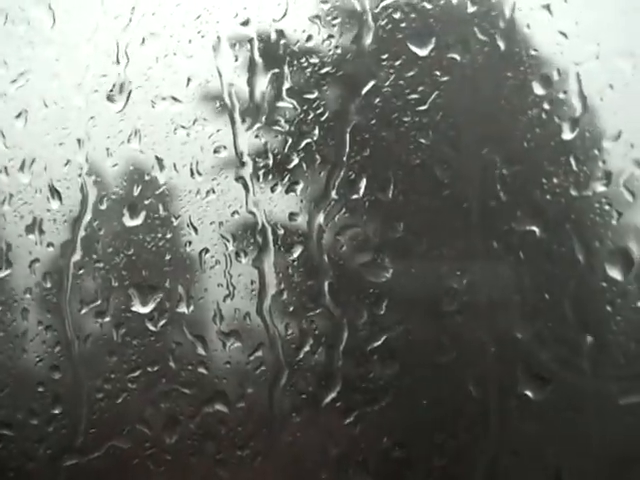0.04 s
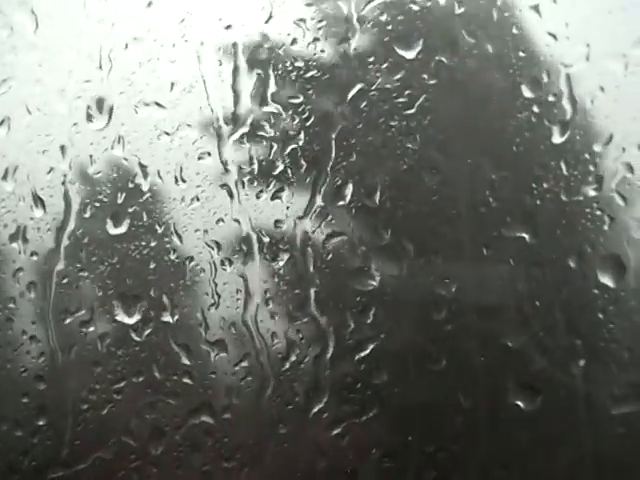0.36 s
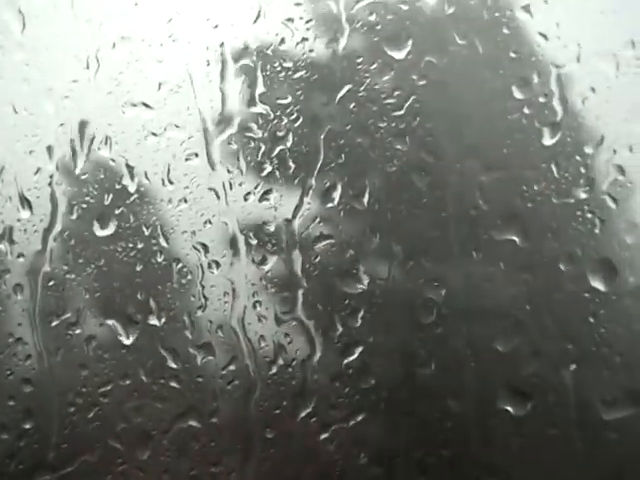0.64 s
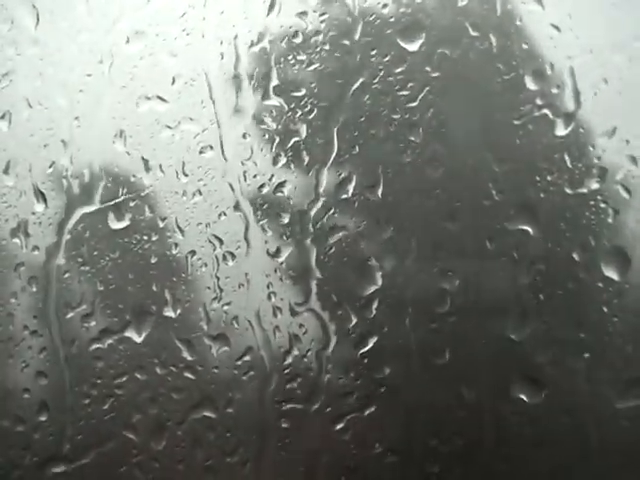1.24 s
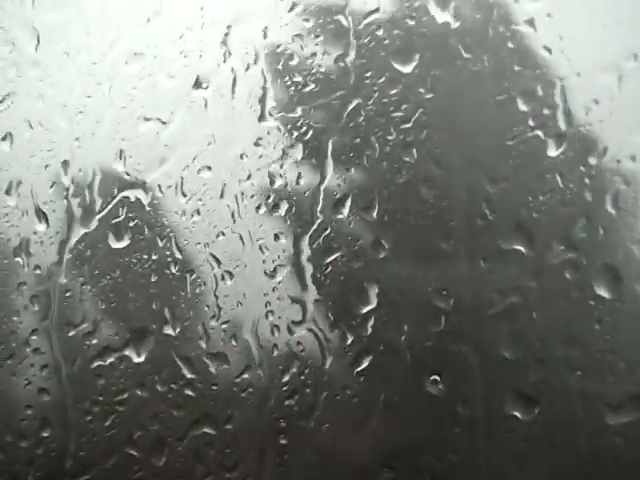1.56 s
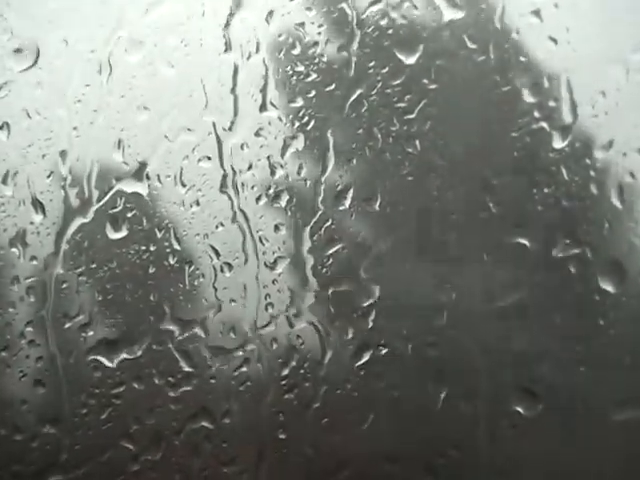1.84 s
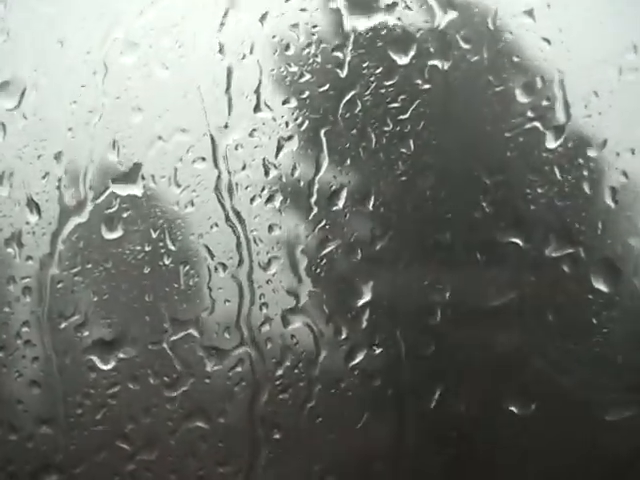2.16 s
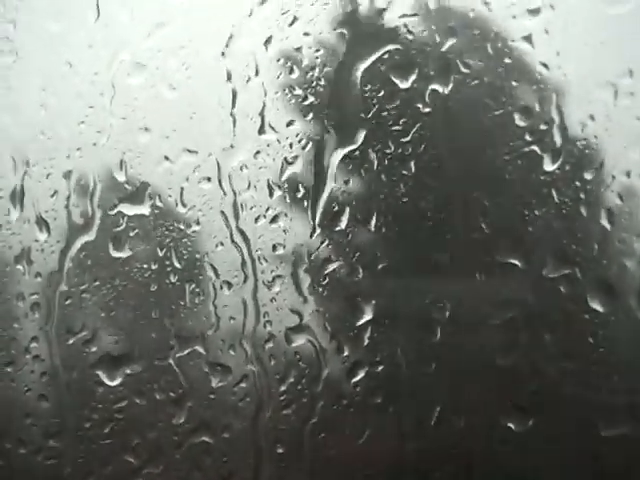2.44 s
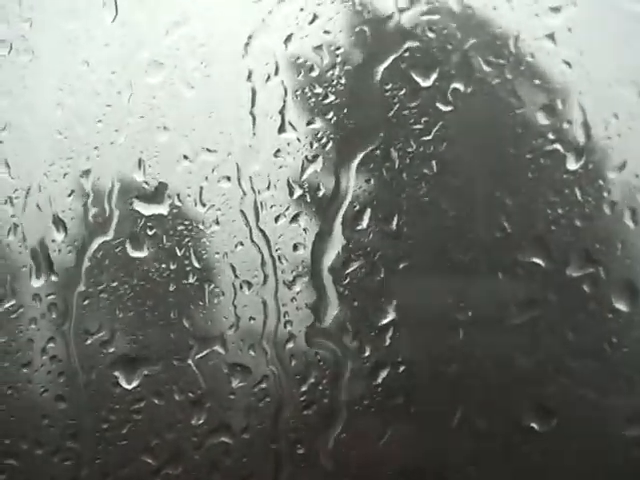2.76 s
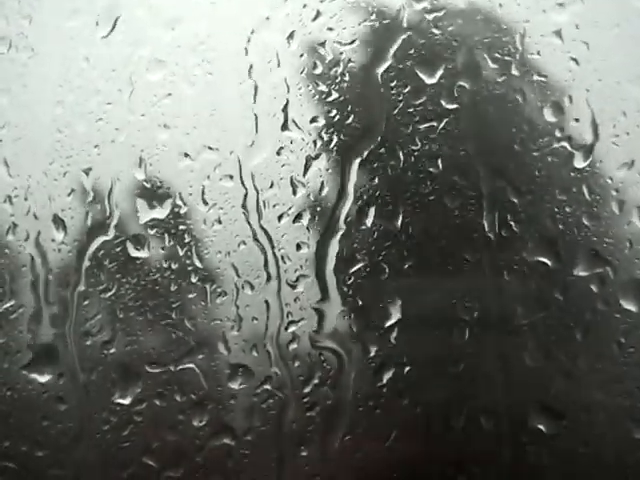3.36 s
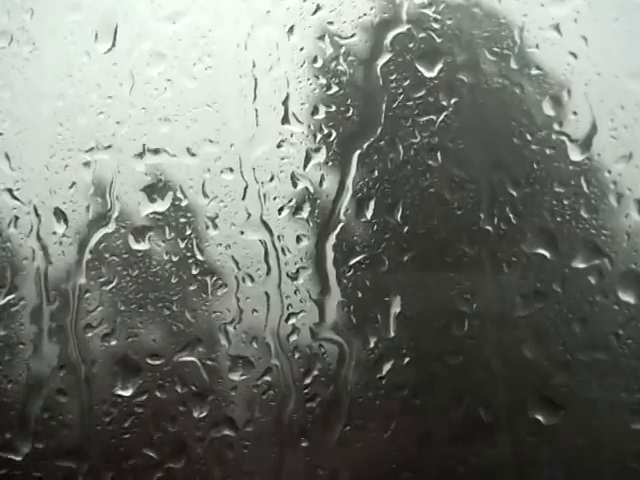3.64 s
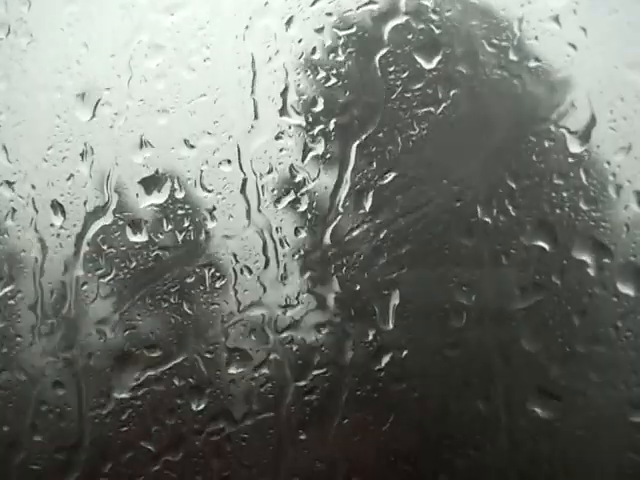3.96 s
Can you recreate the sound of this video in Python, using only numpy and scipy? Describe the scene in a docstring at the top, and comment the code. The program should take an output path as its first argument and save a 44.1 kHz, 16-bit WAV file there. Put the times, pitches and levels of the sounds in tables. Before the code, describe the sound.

Hail strikes a parked car, heard from inside close to the window. Separate booming knocks on the roof and sharp cracks on the glass thicken into a dense clatter over steady rain, and small ticking pellets join in.

```python
"""Inside a parked car in hail and fat raindrops, stereo microphone close behind the wet window.
Stones on the roof and panels clatter and make the cabin boom; those on the near glass crack sharply.
Single blows thicken into a dense clatter over a steady wash of rain, and small pellets join in.
The loudest blows overload the microphone."""
import sys
import numpy as np
from scipy import signal
from scipy.fft import rfft, irfft
from scipy.io import wavfile

SR = 44100
rng = np.random.default_rng(int(sys.argv[2]) if len(sys.argv) > 2 else 0)


def log_audio(samples):
    """Write samples as a 16-bit WAV file to the path given in sys.argv[1]."""
    # one column per channel
    frames = np.atleast_2d(samples).T
    # limit to full scale, then quantise
    limited = np.clip(frames, -1, 1)
    pcm = np.round(limited * 32767).astype(np.int16)
    wavfile.write(sys.argv[1], SR, pcm)


N = 176400

# Table levels are relative: each source sets its own gain.
# the two microphone ports (frequency [Hz], unrelated part [dB], left minus right [dB])
MIC_PORTS = [(30, -14, -2), (120, -18, -4), (300, -31, -3), (700, -17, -2.5), (1400, -20, -2.5),
             (2940, -10.5, -1.6), (5600, -11, -0.6), (9050, -4.5, 1.2), (13000, 1.5, 1.5)]
# borders of the four registers: boom, knock, clatter, sizzle (frequency [Hz])
REGISTER_EDGES = [20, 450, 1800, 5000, 20000]

# colour of the steady rain on the body (frequency [Hz], level [dB])
RAIN_COLOUR = [(25, -33), (60, -15.5), (125, -8.5), (180, -5), (290, 2.5), (400, -11), (650, -4),
               (950, -9.5), (1400, -17.5), (2300, -18.5), (3900, -19), (6000, -30), (8500, -36),
               (12000, -48), (15500, -55)]
# thin ring in the rain's hiss (centre [Hz], width [Hz], lift [dB])
HISS_RING = (3130, 300, 9.5)
# small pellets between the big stones (time [s], level [dB])
PELLET_SWELL = [(0, -71), (2.45, -68), (2.7, -28.5), (4, -33)]

# colour of the struck glass (frequency [Hz], level [dB])
GLASS_COLOUR = [(400, -9.5), (1500, -17.5), (2700, 0.5), (4400, 4), (6200, -0.5), (8000, -5.5),
                (10000, -11), (15000, -31)]
# the pane's knock, crack and sizzle (t60 [s], frame ring share [ratio], frame t60 [s], lift [dB])
GLASS_DECAYS = [(0.0084, 0.18, 0.1, -3), (0.013, 0.39, 0.093, 1.5), (0.015, 0.13, 0.085, 2.5)]
# stones on the near window (time [s], knock [dB], crack [dB], sizzle [dB])
GLASS_BLOWS = [(0.21, -38, -19, -18), (0.313, -15, -15.5, -16), (0.457, -15, -18, -17.5),
               (0.685, -29, -53, -37), (1.188, -44, -19, -20.5), (1.298, -20, -23.5, -22.5),
               (1.348, -33, -28, -26), (1.402, -21, -15.5, -13), (1.45, -10, -16, -22),
               (1.4995, -9, -19, -18), (1.595, -5, -14, -26), (1.927, -16.5, -21.5, -31),
               (1.9413, -29, -11, -11.5), (2.271, -23, -15, -16), (2.544, -20, -17.5, -29),
               (2.559, -20, -21, -24), (2.638, -15, -8, -3.5), (2.684, -14, -17, -21),
               (2.723, -17, -11, -17.5), (2.86, -14, -27.0, -10), (2.917, -32, -20, -18),
               (2.9254, -18, -16.5, -18), (2.992, -12, -16, -19), (3.039, -18, -12.5, -21),
               (3.162, -17, -11.5, -15.5), (3.259, -7, -18, -16), (3.289, -26, -15, -17.5),
               (3.428, -34, -16, -15), (3.468, -17, -11, -32), (3.534, -17, -13, -24),
               (3.559, -28, -28, -25), (3.618, -31, -17, -24), (3.697, -8, -13.5, -21),
               (3.735, -31, -19, -17), (3.84, -26, -14, -17), (3.924, -22, -17, -24),
               (3.995, -20, -12, -22)]

# colour of the struck panels (frequency [Hz], level [dB])
PANEL_COLOUR = [(30, -58.5), (60, -37.5), (120, -21.5), (170, -13.5), (230, -9), (300, -4.5), (410, -7),
                (500, -9), (620, -13.5), (1000, -12.5), (1600, -11.5), (2200, -10.5), (2700, -8),
                (3300, -12), (4200, -11.5), (6000, -19), (8200, -19.5), (10000, -33.5), (13000, -41),
                (15500, -61)]
# the panels' four registers (attack [s], t60 [s], cabin tail share [ratio], tail t60 [s])
PANEL_DECAYS = [(0.018, 0.56, 0.034, 1), (0.0024, 0.38, 0.029, 1), (0.00082, 0.17, 0.16, 0.98),
                (0.00023, 0.11, 0.16, 0.62)]
# modes of the roof and panels (frequency [Hz], t60 [s], level against their register [dB])
METAL_MODES = [(234, .4, -15), (290, .45, -10), (317, .35, -11), (343, .28, -13), (418, .3, -15),
               (537, .28, -13), (712, .28, -14), (1087, .42, -11), (1508, .28, -13), (1642, .28, -13),
               (2645, .2, -10), (3998, .14, -14), (4596, .14, -16)]
# pitched thuds and knocks of hollow spots (time [s], frequency [Hz], level [dB], t60 [s])
HOLLOW_BLOWS = [(0.213, 288, -10.5, 0.54), (0.407, 249, -15.5, 0.36), (0.412, 316, -14, 0.38),
                (0.884, 287.8, -14.5, 0.43), (1.141, 343, -4, 0.12), (1.141, 290, -18, 0.52),
                (1.451, 880, 2.5, 0.021), (1.472, 321, -7, 0.28), (1.595, 2140, -5, 0.038),
                (1.6, 303.6, -2.5, 0.19), (2.107, 287, -12.5, 0.44), (2.268, 291, -7, 0.13),
                (2.361, 345.7, -6, 0.21), (2.361, 398, -11, 0.1), (2.576, 297, -6.5, 0.18),
                (2.655, 290.3, -13.5, 0.52), (2.85, 338, -5, .2), (2.884, 283.5, -8.5, 0.5),
                (2.887, 2180, -6, 0.049), (3.158, 292, -14.5, 0.59), (3.288, 345.6, -10.5, .28),
                (3.503, 693, -11, 0.1), (3.52, 337, -9.5, 0.3), (3.603, 296.7, -16, .35),
                (3.717, 304, -13, .32), (3.908, 272, -13, 0.19), (3.958, 662, -6.5, 0.081)]
# stones on roof and panels (time [s], boom [dB], knock [dB], clatter [dB], sizzle [dB])
PANEL_BLOWS = [(-0.004, -16.5, -26, -21, -21.5), (0.173, -25, -32, -29.5, -26),
               (0.209, -12, -21, -14.5, -14.5), (0.232, -22, -23.5, -21, -24),
               (0.284, -49, -24.5, -22, -22), (0.314, -20, -30, -20.5, -26),
               (0.407, -15, -18.5, -18.5, -27), (0.468, -22, -34, -23.5, -24), (0.656, -69, -37, -86, -36),
               (0.884, -20.5, -24, -19, -19), (1.141, -17.5, -18, -19, -23.5),
               (1.186, -43, -30, -25.5, -26), (1.299, -41, -33.5, -28.5, -27),
               (1.363, -25, -25, -27, -25.5), (1.404, -32, -24, -24, -30), (1.433, -32, -35, -21, -21),
               (1.451, -13.5, -16, -12.5, -17.5), (1.499, -16, -19.5, -11.5, -16),
               (1.516, -12.5, -16, -23, -21), (1.594, -13, -14, -16.5, -18.5), (1.651, -20, -15, -21, -28),
               (1.668, -19, -22, -25, -46), (1.77, -19, -26.5, -20.5, -22.5),
               (1.973, -21.5, -29.5, -21.5, -19), (2.102, -14, -20.5, -15, -20.5),
               (2.127, -21, -22.5, -23, -23), (2.204, -14, -21, -15, -17), (2.24, -13, -17, -15, -21),
               (2.268, -14, -16, -11, -12), (2.36, -13.5, -17, -15.5, -17), (2.408, -11, -16.5, -12.5, -16),
               (2.558, -25, -19.5, -11.5, -12), (2.576, -12, -16.5, -17.5, -16),
               (2.607, -49, -18, -15.5, -14), (2.655, -10.5, -18, -15, -17.5),
               (2.685, -18.5, -18.5, -17, -14.5), (2.76, -16, -23.5, -20, -20),
               (2.818, -18, -21, -17.5, -19.5), (2.84, -44, -49, -19, -21),
               (2.856, -9.5, -14.5, -15.5, -15), (2.884, -10.5, -16.5, -12.5, -21.5),
               (2.943, -15, -18, -12.5, -13), (2.99, -11, -20.5, -17.5, -20),
               (3.032, -25, -16, -13.5, -15.5), (3.07, -13.5, -24.5, -27, -29),
               (3.136, -25, -18, -18, -19.5), (3.158, -12.5, -22, -17.5, -14.5),
               (3.259, -10, -16, -15.5, -18), (3.288, -19, -18, -17.5, -19),
               (3.308, -23, -22.5, -17.5, -20.5), (3.343, -11.5, -18, -15.5, -18.5),
               (3.357, -16, -18, -19, -25), (3.429, -16.5, -19, -18.5, -18),
               (3.5, -19, -15.5, -16.5, -21.5), (3.534, -16, -16.5, -13, -24.5),
               (3.57, -28, -23, -15.5, -19), (3.58, -26, -22, -22, -21), (3.603, -12.5, -18.5, -13, -15.5),
               (3.691, -11.5, -19, -14, -21), (3.717, -17, -15.5, -14.5, -19.5),
               (3.793, -12, -22.5, -17.5, -18.5), (3.815, -20, -18, -13, -11),
               (3.854, -54, -19.5, -16, -16), (3.877, -10, -45, -15, -19.5), (3.908, -19, -17.5, -16, -18),
               (3.93, -21, -29, -18, -24), (3.952, -28, -17.5, -14, -20), (3.976, -10, -36, -12.5, -14.5)]

BIN_HZ = np.arange(N // 2 + 1) * SR / N


def undb(db):
    """Decibels to gain."""
    return 10 ** (np.asarray(db) / 20)


def curve_db(table, column=1):
    """One column of a table spread over the spectrum on a log-frequency axis."""
    table = np.array(table, float)
    return np.interp(np.log(BIN_HZ + 1), np.log(table[:, 0]), table[:, column])


def unit(x):
    """Scale a stereo sound so that its middle has rms 1."""
    return x / np.sqrt(np.mean(x.mean(0) ** 2) + 1e-18)


def fade(t, t60):
    """Exponential decay, 60 dB down at t60."""
    return np.exp(-np.log(1000) * t / t60)


def register_of(hz):
    """Which of the four registers a frequency falls in."""
    return np.searchsorted(REGISTER_EDGES, hz) - 1


def at_microphone(pair, gain):
    """Colour a mid and a side signal and spread them on the ports: alike in bass, apart in treble."""
    mid, side = rfft(pair) * gain
    sign = np.array([[1], [-1]])
    width = undb(curve_db(MIC_PORTS, column=1))
    balance = undb(sign * curve_db(MIC_PORTS, column=2) / 2)
    return irfft((mid + sign * side * width) * balance, N)


def dense_ringing(colour):
    """The crowded modes of a body as coloured noise, one stereo band for each register."""
    gain, bands = undb(curve_db(colour)), []
    for low, high in zip(REGISTER_EDGES[:-1], REGISTER_EDGES[1:]):
        rolloff = np.sqrt((1 + (low / (BIN_HZ + 1)) ** 12) * (1 + (BIN_HZ / high) ** 12))
        bands.append(unit(at_microphone(rng.standard_normal((2, N)), gain / rolloff)))
    return bands


def strike(out, start_s, ringing, envelope, db, spot):
    """Add one blow: each spot struck rings with its own mix of modes, at the energy of the blow."""
    length, first = len(envelope), int(round(start_s * SR))
    offset = int(spot * (N - length))
    blow = ringing[:, offset:offset + length] * envelope
    blow = blow * undb(db) * np.sqrt(np.sum(envelope ** 2) / np.sum(blow.mean(0) ** 2))
    begin, end = max(first, 0), min(first + length, N)
    if end > begin:
        out[:, begin:end] += blow[:, begin - first:end - first]


def patter(envelope, per_s, spread_db):
    """Small impacts at random moments, slightly uneven in strength, each a short burst of noise."""
    moment, size = rng.random((int(per_s * N / SR), 2)).T
    strength = undb(-spread_db * np.log(size * .99 + .01))
    energy = np.bincount((moment * N).astype(int), strength ** 2, N)
    power = np.maximum(signal.fftconvolve(energy, envelope ** 2)[:N], 0)
    return rng.standard_normal((2, N)) * np.sqrt(power / power.mean())


def glass_envelope(t60, frame_share, frame_t60, attack_s=0.0002):
    """A hard tick of first contact, a crack that dies at once, then a short ring of the frame."""
    t = np.arange(SR // 10) / SR
    contact = 0.86 * fade(t, t60=0.0046)
    return (1 - np.exp(-t / attack_s)) * (contact + fade(t, t60) + frame_share * fade(t, frame_t60))


def rain(level_db=-31.5):
    """Countless drops drum on the body over a smooth wash from farther off; the hiss has a thin ring."""
    drop = fade(np.arange(SR // 10) / SR, t60=0.036)
    drops = patter(drop, per_s=560, spread_db=-0.5)
    wash = 0.8 * rng.standard_normal((2, N))
    centre, width, lift = HISS_RING
    colour_db = curve_db(RAIN_COLOUR) + lift / (1 + (2 * (BIN_HZ - centre) / width) ** 2)
    return undb(level_db) * unit(at_microphone(drops + wash, undb(colour_db)))


def pellets():
    """Small ice ticks on the near glass, louder as the shower grows."""
    crack = glass_envelope(*GLASS_DECAYS[1][:-1])
    ticks = at_microphone(patter(crack, per_s=120, spread_db=1), undb(curve_db(GLASS_COLOUR)))
    level_db = np.interp(np.arange(N) / SR, *np.array(PELLET_SWELL).T)
    return unit(ticks) * undb(level_db)


def hail_on_glass():
    """Stones on the pane right by the microphone: dry, bright cracks without boom."""
    out = np.zeros((2, N))
    bands = dense_ringing(GLASS_COLOUR)[1:]
    for (start, *levels), spot in zip(GLASS_BLOWS, rng.random(len(GLASS_BLOWS))):
        for band, (*decay, lift), db in zip(bands, GLASS_DECAYS, levels):
            strike(out, start, band, glass_envelope(*decay), db + lift, spot)
    return out


def struck_modes(hz, db, t60, phase):
    """Modes of sheet metal: sines that swell and die away, the low ones swelling slowest."""
    t = np.arange(SR // 2) / SR
    attack_s = np.array(PANEL_DECAYS)[register_of(hz), 0]
    hz, db, t60, phase, attack_s = (np.reshape(v, (-1, 1)) for v in (hz, db, t60, phase, attack_s))
    envelope = (1 - np.exp(-t / attack_s)) * fade(t, t60)
    return np.sqrt(2) * np.sum(undb(db) * envelope * np.sin(2 * np.pi * (hz * t + phase)), axis=0)


def panel_tones(gain_db=-5, spread_db=2, detune=0.005):
    """The faint modes that each blow on the metal sets ringing, and the pitched thuds of hollow spots."""
    hz, t60, mode_db = np.array(METAL_MODES).T
    tones, out = [], np.zeros(N + SR)
    for start, *levels in PANEL_BLOWS:
        size, drift, phase = rng.standard_normal((3, len(hz)))
        db = np.array(levels)[register_of(hz)] + mode_db + spread_db * size
        tones.append((start, struck_modes(hz * (1 + detune * drift), db, t60, phase)))
    tones += [(start, struck_modes(*knock, rng.random())) for start, *knock in HOLLOW_BLOWS]
    for start, tone in tones:
        first = max(int(start * SR), 0)
        out[first:first + len(tone)] += tone
    return at_microphone(np.array([out[:N], np.zeros(N)]), undb(gain_db))


def hail_on_panels(gain_db=-2, boom_trim_db=-5.5):
    """Stones on sheet metal overhead: the treble comes at once and dies fast, the boom lingers."""
    t, out = np.arange(SR // 2) / SR, np.zeros((2, N))
    bands = dense_ringing(PANEL_COLOUR)
    envelopes = [(1 - np.exp(-t / attack_s)) * (fade(t, t60) + cabin_share * fade(t, cabin_t60))
                 for attack_s, t60, cabin_share, cabin_t60 in PANEL_DECAYS]
    for (start, boom, *upper), spot in zip(PANEL_BLOWS, rng.random(len(PANEL_BLOWS))):
        for band, envelope, db in zip(bands, envelopes, [boom + boom_trim_db] + upper):
            strike(out, start, band, envelope, db + gain_db, spot)
    return out


def scene():
    """From inside the cabin: hail on metal and glass over the rain."""
    return hail_on_panels() + panel_tones() + hail_on_glass() + pellets() + rain()


def record(dry):
    """The overloaded microphone rounds off the hardest cracks; the recorder cuts the top."""
    ceiling, knee, top_hz = 0.84, 5.2, 16000
    rounded = dry / (1 + np.abs(dry / ceiling) ** knee) ** (1 / knee)
    return signal.sosfilt(signal.ellip(10, .2, 70, top_hz, fs=SR, output="sos"), rounded)


dry = scene()
out = record(dry)
log_audio(out)
```